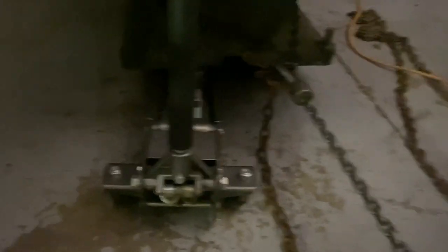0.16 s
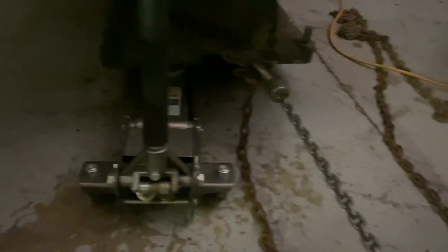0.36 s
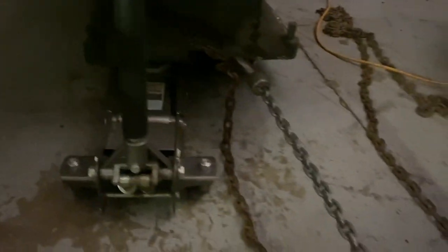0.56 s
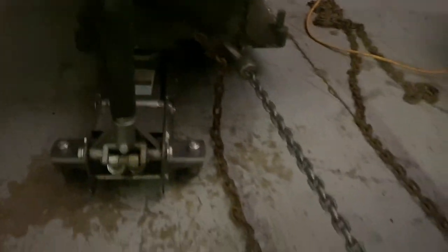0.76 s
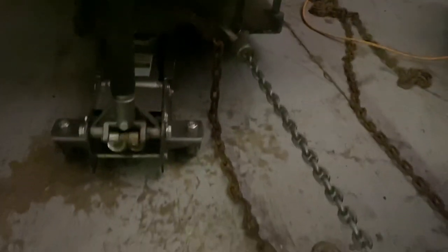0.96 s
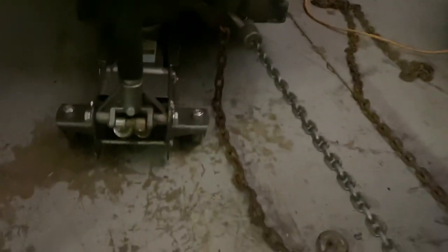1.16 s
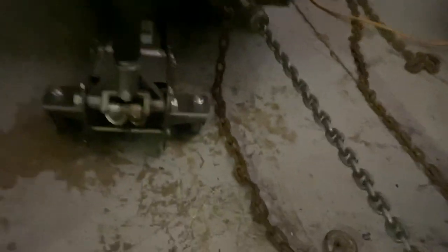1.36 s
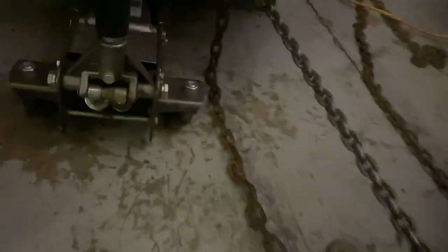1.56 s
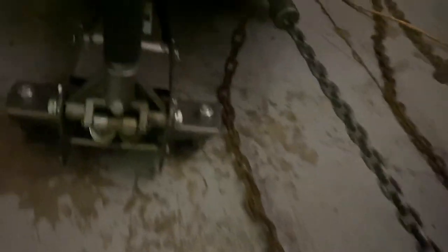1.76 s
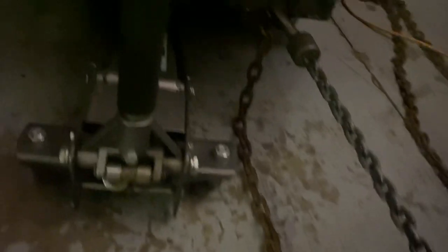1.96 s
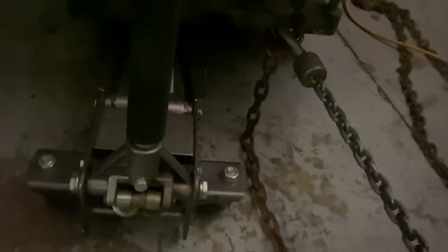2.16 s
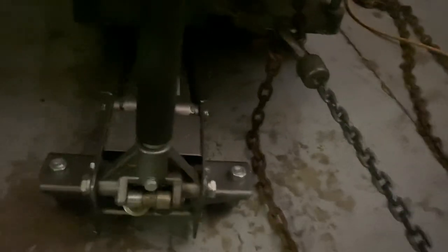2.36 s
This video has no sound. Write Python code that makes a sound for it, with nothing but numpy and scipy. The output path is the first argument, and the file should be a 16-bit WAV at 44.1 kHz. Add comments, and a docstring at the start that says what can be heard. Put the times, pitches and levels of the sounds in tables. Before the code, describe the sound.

Ratchet and chain clatter in uneven bursts with low floor shudder, pause, squeak on a falling pitch, then click back tooth by tooth; soft gritty scraping, low room rumble, short hall echo, dulled top treble.

```python
"""Hand ratchet puller in a workshop

On the pulling stroke each tooth sets pawl and chain rattling: grit bursts crack and ring steel modes.
The machine shudders on two floor modes and noise; the lever squeaks (sines), then clicks back.
A low thump, grainy scraping and steady air (noise) lie beneath.
Two microphone ports hear every sound with their own phase and balance."""
import sys
import numpy as np
from scipy import signal
from scipy.fft import rfft, irfft, next_fast_len
from scipy.io import wavfile
from scipy.ndimage import map_coordinates

SR = 44100
rng = np.random.default_rng(int(sys.argv[2]) if len(sys.argv) > 2 else 0)


def to_wav(sig):
    """Store sig (one row per channel, or 1-D mono) as 16-bit WAV at the path in sys.argv[1].

    Samples outside -1..1 are clipped; the rate is SR.
    """
    pcm = np.clip(np.atleast_2d(sig), -1, 1) * 32767
    pcm = np.round(pcm).astype(np.int16)
    wavfile.write(sys.argv[1], SR, pcm.T)  # frames by channels


N = 110250

# contacts of pawl and links under load, levels before the band tone is added:
# (time [s], treble [dB], body [dB], low ring [dB], middle ring [dB])
RATTLE_CONTACTS = [(0.0014, -17, -37, -18, -20.5), (0.0172, -20, -43, -25.5, -19),
                   (0.0514, -37, -38, -27, -41.5), (0.1321, -9.5, -35.5, -38.5, -19.5),
                   (0.1364, -19.5, -51, -17, -52), (0.1424, -52, -50, -16.5, -29),
                   (0.1506, -7, -31.5, -26.5, -46), (0.1717, -36, -43.5, -32.5, -27),
                   (0.2585, -8.5, -41.5, -16.5, -13.5), (0.2648, -2, -39, -23.5, -22),
                   (0.2795, -34.5, -47.5, -22, -22), (0.2945, -20.5, -39.5, -23.5, -36),
                   (0.3421, -20, -38, -31.5, -31.5), (0.3705, 0.5, -30.5, -15, -12),
                   (0.3798, -14, -30, -29.5, -17), (0.3944, -20, -28, -27.5, -24.5),
                   (0.4014, -7, -32.5, -19, -22), (0.4104, -43.5, -49.5, -38, -24),
                   (0.5027, -5.5, -36.5, -19.5, -24.5), (0.5135, -11, -33.5, -34, -32.5),
                   (0.5296, -27, -54, -20, -22.5), (0.5444, -26, -31, -30, -28),
                   (0.5621, -18.5, -37, -41, -24), (0.603, -46, -46, -45.5, -47),
                   (0.6542, -51, -54, -44, -33.5), (0.6924, -12.5, -56, -31.5, -13.5),
                   (0.6962, -4.5, -33, -25, -10), (0.7034, -16, -55, -39, -19.5),
                   (0.7100, -21.5, -39.5, -42, -13), (0.7174, -10.5, -54, -31, -21),
                   (0.7536, -17, -37.5, -26.5, -49.5), (0.7644, -29.5, -44.5, -37, -40.5),
                   (0.9911, -60, -49, -54.5, -82), (1.053, -34, -57.5, -54, -37),
                   (1.0775, -31, -48, -49, -40), (1.1125, -28.5, -52.5, -47, -49),
                   (1.123, -34, -48, -34, -39)]
# pawl drops over a tooth, and lesser ticks, levels before the band tone is added:
# (time [s], treble [dB], body [dB], low ring [dB], middle ring [dB], upper ring [dB])
CLICK_CONTACTS = [(1.1303, -26, -60, -28.5, -27, -21), (1.4324, -42.5, -59.5, -48.5, -50.5, -50.5),
                  (1.4778, -13.5, -37.5, -18, -22.5, -21.5), (1.5854, -16, -50, -17, -24, -22),
                  (1.6822, -15.5, -52, -21.5, -24.5, -19), (1.7827, -14.5, -56, -18.5, -21.5, -19.5),
                  (1.9109, -18, -47.5, -13, -24.5, -19.5), (2.0446, -14.5, -50, -16.5, -17.5, -24.5),
                  (2.1893, -15.5, -45, -20.5, -22, -21), (2.309, -62, -65.5, -41, -44.5, -57)]
# steel modes under load and running free, before detuning: (frequency [Hz], width [Hz], relative level [dB])
LOADED_MODES = [(820, 40, -9), (1470, 48, 5), (2305, 48, 4), (3520, 50, -2), (4000, 80, -6), (4900, 60, -2),
                (5940, 50, -4), (6280, 12, 1)]
FREE_MODES = [(965, 45, -4), (1280, 60, 0), (1880, 55, -2), (2220, 50, -4), (3400, 70, -2), (4300, 80, -2),
              (4900, 60, -2), (6280, 25, -2)]
# spectrum of the crack beside the ring: (frequency [Hz], relative level [dB])
RATTLE_CRACK = [(150, -47), (400, -13.5), (1400, -6.5), (3000, -10.5), (6500, -9), (9000, -23.5)]
CLICK_CRACK = [(40, -38.5), (90, -23.5), (500, -18), (1300, -2.5), (4000, 11.5), (6200, 5), (9000, -20)]
# tone of each contact band, lowest band first, treble last: (frequency [Hz], added level [dB])
RATTLE_TONE = [(850, 29), (1450, 19), (2300, 17.5), (4000, 4.5)]
CLICK_TONE = [(400, 51.5), (1200, 20), (2200, 21), (3800, 2), (6000, 12.5)]
# pivot tones before waver: (time [s], pitch [Hz], level [dB])
SQUEAK_TRACK = [(1.02, 1770, -57), (1.027, 1735, -41.5), (1.046, 1647, -38.5), (1.082, 1626, -36),
                (1.097, 1440, -43), (1.115, 1395, -56.5)]
SQUEAL_TRACK = [(2.33, 5800, -75), (2.36, 5880, -59), (2.436, 6090, -58), (2.46, 6100, -75)]
# shudder levels: (time [s], deep mode [dB], upper mode [dB], grinding [dB])
SHUDDER_LEVELS = [(0, -43.5, -31, -40), (0.081, -60.5, -83.5, -52.5), (.4, -63, -46, -48.5),
                  (.53, -74, -55.5, -51), (.58, -35, -29.5, -40.5), (0.641, -36, -54, -61),
                  (.72, -46, -41, -47.5), (.77, -35.5, -42, -41), (.82, -35, -34, -51),
                  (0.922, -42, -41.5, -59), (.98, -78.5, -48.5, -73), (1.099, -56, -54, -73)]
# floor modes: (frequency [Hz], relative waver [1])
FLOOR_MODES = [(66, 0.06), (115, 0.07)]
# scraping before grain: (time [s], level [dB])
SCRAPE_LEVELS = [(.85, -50.5), (1.0, -61), (1.06, -54.5), (1.2, -49), (1.33, -52), (1.4, -58.5),
                 (1.46, -51.5), (2.0, -51), (2.29, -55.5), (2.32, -46), (2.42, -54), (2.5, -54)]
# noise spectra: (frequency [Hz], relative level [dB])
SCRAPE_COLOUR = [(100, -39), (300, 2), (820, -7), (2000, -5), (3500, -16), (6200, -18), (8700, -54.5)]
AIR_COLOUR = [(20, -39), (40, 0), (62, -1.5), (110, -1), (200, -9.5), (450, -36.5), (900, -57.5)]
# port phase per stroke: (frequency [Hz], left lead [rad])
PULL_PHASE = [(260, 1.9), (1120, 1.0), (1640, -2.7), (2760, -3.5), (3360, -7.1), (4650, -5.9),
              (7320, -11.3), (7580, -10.4), (8440, -15.5)]
BACK_PHASE = [(260, 1.8), (1030, 1.4), (1810, -1.8), (3880, -6.4), (4390, -6.5), (5600, -1.7), (6030, -1.9),
              (7840, -7.9), (8440, -7.9)]
# port balance per stroke: (frequency [Hz], left minus right [dB])
PULL_SIDE = [(60, 1.5), (140, -4.5), (400, .5), (900, -1), (1500, -8), (2800, -3.5), (5000, 2.5)]
BACK_SIDE = [(60, 1), (160, -3), (400, 0), (1600, -3), (2800, -1.5), (4800, 2.5)]
# decay of near scatter and hall: (frequency [Hz], time to -60 dB [s])
NEAR_T60 = [(500, 0.056), (4000, 0.081), (9000, 0.027)]
HALL_T60 = [(500, 0.17), (4000, 0.51), (9000, 0.25)]
# microphone response: (frequency [Hz], gain [dB])
MICROPHONE = [(6500, -1.48), (8400, -2.5), (9200, -10), (11500, -21.5), (16000, -76)]

TOP_HZ = 16000
AIR_DB = -49
GRIND_HZ, GRIND_WIDTH_HZ = 260, 197
LAG_SCATTER_S = 25e-6  # contacts lie at different places: scatter of the lag between ports
SWELL_DB, SWELL_S = -27, .0035  # faint soft swell and fade around each contact
THUMP_TIME_S, THUMP_DB, THUMP_LENGTH_S = 1.6, -28.5, .0012


def amp(db):
    """Amplitude factor of a level in dB."""
    return 10 ** (np.asarray(db) / 20)


def unit(x):
    """Scale to rms 1."""
    return x / np.sqrt(np.mean(x ** 2) + 1e-20)


def along(points, hz):
    """Interpolate (Hz, value) points on a near-log axis; end values hold beyond the ends."""
    f, v = np.transpose(points)
    return np.interp(np.log(hz + 30), np.log(f + 30), v)


def curves(rows):
    """One value per sample for each column after the time."""
    s, *cols = np.transpose(rows)
    return [np.interp(np.arange(N) / SR, s, c) for c in cols]


def wobble(rate_hz):
    """Smooth random curve with rate_hz knots a second."""
    knots = rng.standard_normal(int(N * rate_hz / SR) + 4)
    return map_coordinates(knots, [np.arange(N) * rate_hz / SR])


def filtered(x, response):
    """Apply a complex response of frequency."""
    m = next_fast_len(N + SR // 2)
    return irfft(rfft(x, m) * response(np.fft.rfftfreq(m, 1 / SR)), m)[..., :N]


def resonance(f, hz, width_hz):
    """Second-order bandpass response of one mode, peak 1."""
    return 1j * f * width_hz / (hz * hz - f * f + 1j * f * width_hz)


def ports(x, phase, side):
    """Split phase and level difference evenly between two ports; phase is constant through the bass."""
    half = np.array([[.5], [-.5]])
    return filtered(x, lambda f: amp(half * along(side, f)) * np.exp(1j * half * along(phase, f)))


def tail(x, t60, delay_s, size):
    """Diffuse reverberation: the energy of each band lingers as fresh noise and decays at its own rate."""
    delay = round(delay_s * SR)
    hz, t, z = signal.stft(np.pad(x, (delay, 0)), SR, nperseg=size)
    linger = amp(-60 * t / along(t60, hz)[:, None]) ** 2
    kernel = linger / linger.sum(1).mean()
    power = np.abs(signal.fftconvolve(np.abs(z) ** 2, kernel, axes=1)[:, :len(t)])
    noise = signal.stft(rng.standard_normal(N + delay), SR, nperseg=size)[2]
    return signal.istft(noise / np.abs(noise).mean() * np.sqrt(power), SR, nperseg=size)[1][:N]


def in_room(x, phase, side, near_db, hall_db, apart_db):
    """Direct sound, near scatter and hall; part of the reverberation differs from port to port."""
    mono = np.atleast_2d(x).mean(0)

    def wet():
        near = amp(near_db) * tail(mono, NEAR_T60, .006, size=256)
        hall = amp(hall_db) * tail(mono, HALL_T60, .024, size=1024)
        return near + hall

    shared = wet()
    separate = np.array([wet(), wet()])
    return ports(x + shared + amp(apart_db) * separate, phase, side)


def bed(colour, apart_db):
    """Coloured stereo noise of rms 1: a shared part and a separate part per port."""
    x = rng.standard_normal(N) + amp(apart_db) * rng.standard_normal((2, N))
    coloured = filtered(x, lambda f: amp(along(colour, f)))
    return unit(ports(coloured, BACK_PHASE, BACK_SIDE))


def air():
    """Low-frequency background noise, slightly unsteady in level."""
    return amp(AIR_DB + 2 * wobble(9)) * bed(AIR_COLOUR, apart_db=-3)


def scrape():
    """Grainy sliding of chain and steel feet on concrete: noise with slow and fast level waver."""
    db, = curves(SCRAPE_LEVELS)
    grain_db = 2 * wobble(5.1) + 2 * wobble(370)
    return amp(db + grain_db) * bed(SCRAPE_COLOUR, apart_db=12.5)


def shudder():
    """The dragged machine excites two low, wavering floor modes and grinds above them."""
    fade = np.clip((SHUDDER_LEVELS[-1][0] - np.arange(N) / SR) / 0.023, 0, 1)
    parts = []
    for hz, waver in FLOOR_MODES:
        turn = 2 * np.pi * np.cumsum(hz * (1 + waver * wobble(hz / 3))) / SR
        parts.append(np.sin(turn) * amp(2.5 * wobble(hz / 4)))
    noise = rng.standard_normal(N)
    grind = filtered(noise, lambda f: resonance(f, GRIND_HZ, GRIND_WIDTH_HZ) ** 2)
    parts.append(unit(grind))
    x = sum(amp(db) * part for db, part in zip(curves(SHUDDER_LEVELS), parts))
    return ports(fade * x, PULL_PHASE, PULL_SIDE)


def thump():
    """One low push and return, no ring, between two clicks of the free stroke."""
    u = np.maximum(np.arange(N) / SR - THUMP_TIME_S, 0) / THUMP_LENGTH_S
    push = u * (2 - u) * np.exp(1 - u)
    return ports(amp(THUMP_DB) * push, BACK_PHASE, BACK_SIDE)


def whistle(rows, rough_db, drift):
    """Stick-slip tone of a dry pivot: a sine unsteady in level and pitch."""
    hz, db = curves(rows)
    t = np.arange(N) / SR
    turn = 2 * np.pi * np.cumsum(hz * (1 + drift * wobble(110))) / SR
    on = (t > rows[0][0]) & (t < rows[-1][0])
    return on * amp(db + rough_db * wobble(120)) * np.sqrt(2) * np.sin(turn)


def pivot():
    """A falling squeak as the lever turns and a faint high squeal at the end."""
    squeal = whistle(SQUEAL_TRACK, rough_db=2.5, drift=0.003)
    squeak = whistle(SQUEAK_TRACK, rough_db=-6.0, drift=0.033)
    return in_room(squeak + squeal, PULL_PHASE, PULL_SIDE, near_db=-13, hall_db=-31, apart_db=-2.0)


def strikes(rows, modes, crack, tone, rise_s, fall_s, ring_db, scatter_db, detune):
    """Each contact is a grit burst that cracks and rings the steel modes, varied at random."""
    size, lead = 8192, 1024  # samples; lead leaves room for the swell
    offset = np.arange(size) - lead
    t, f = np.maximum(offset, 0) / SR, np.fft.rfftfreq(size, 1 / SR)
    shape = (1 - np.exp(-(t / rise_s) ** 2)) * np.exp(-t / fall_s)
    shape = shape + amp(SWELL_DB) * np.exp(-np.abs(offset) / SR / SWELL_S)
    grit = rng.standard_normal((len(rows), size))
    chance = rng.standard_normal((len(rows), len(modes) + 1, 2))
    even = np.linalg.norm(shape)  # expected rms of the burst spectrum
    out = np.zeros((2, N + size))
    for (s, treble_db, *lower_db), g, r in zip(rows, grit, chance):
        burst = rfft(g * shape)
        ring = 0
        for k, (mode_hz, width_hz, db) in enumerate(modes):
            hz = mode_hz * (1 + detune * r[k, 1])
            # even out the strike on each mode, boosting at most twofold
            struck = even / max(np.interp(hz, f, np.abs(burst)), even / 2)
            level = amp(db + ring_db + scatter_db * r[k, 0])
            ring = ring + (-1) ** k * level * struck * resonance(f, hz, width_hz)
        bands_db = [*lower_db, treble_db]
        colour = along([(hz, db + add) for (hz, add), db in zip(tone, bands_db)], f)
        lag = np.exp(1j * np.pi * LAG_SCATTER_S * r[-1, 0] * np.outer([1, -1], f))
        hit = irfft(burst * (ring + amp(along(crack, f))) * amp(colour) * lag)
        start = round(s * SR)
        out[:, start:start + size] += hit
    return out[:, lead:lead + N]


def back_stroke():
    """The free stroke: single dry clicks as the pawl drops over the teeth."""
    x = strikes(CLICK_CONTACTS, FREE_MODES, CLICK_CRACK, CLICK_TONE,
                rise_s=.0014, fall_s=0.0032, ring_db=4, scatter_db=3, detune=.02)
    return in_room(x, BACK_PHASE, BACK_SIDE, near_db=-15, hall_db=-23.5, apart_db=7.0)


def pull():
    """The loaded stroke: clustered contacts of pawl and chain links."""
    x = strikes(RATTLE_CONTACTS, LOADED_MODES, RATTLE_CRACK, RATTLE_TONE,
                rise_s=.0012, fall_s=.003, ring_db=9, scatter_db=2.5, detune=.012)
    return in_room(x, PULL_PHASE, PULL_SIDE, near_db=-10, hall_db=-17.5, apart_db=4.5)


def scene():
    """Sum of all layers at the two ports."""
    strokes = pull() + back_stroke()
    return strokes + thump() + pivot() + shudder() + scrape() + air()


def record(dry):
    """The microphone's treble falls away steeply; nothing is kept from the band limit up."""
    return filtered(dry, lambda hz: amp(along(MICROPHONE, hz)) * (hz < TOP_HZ))


dry = scene()
out = record(dry)
to_wav(out)
```